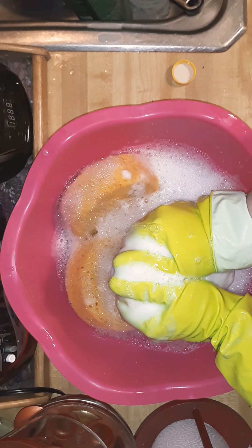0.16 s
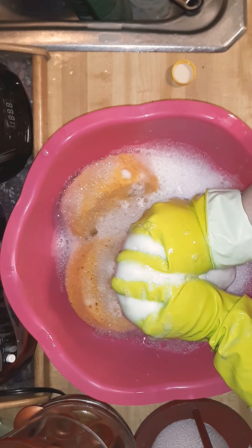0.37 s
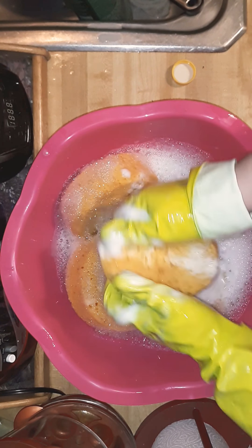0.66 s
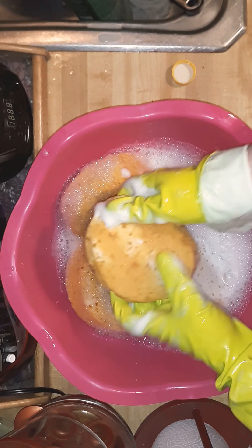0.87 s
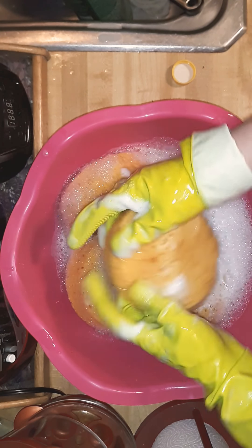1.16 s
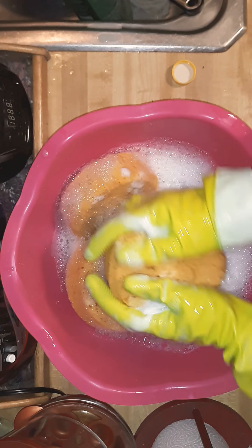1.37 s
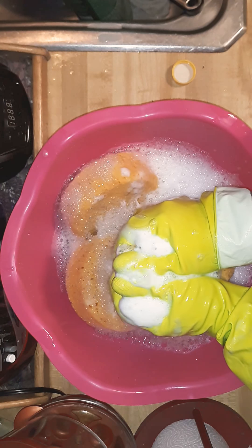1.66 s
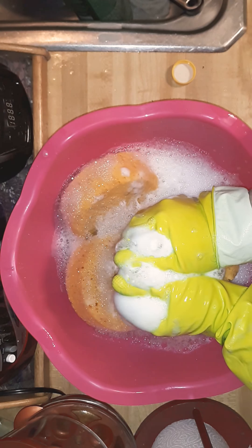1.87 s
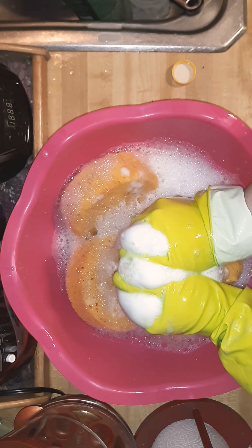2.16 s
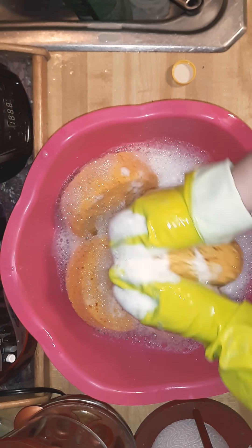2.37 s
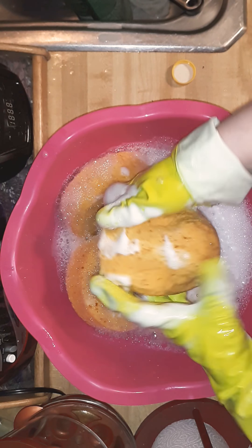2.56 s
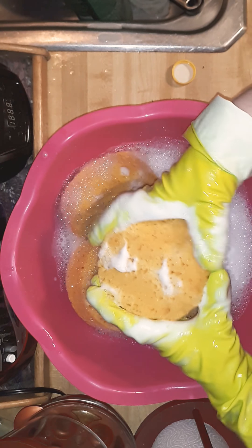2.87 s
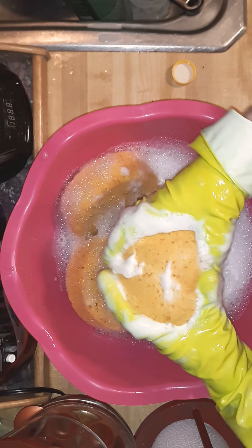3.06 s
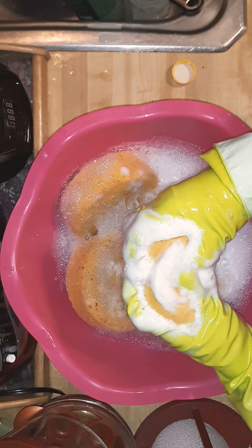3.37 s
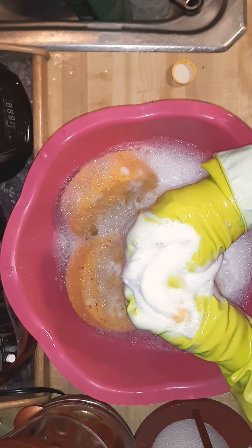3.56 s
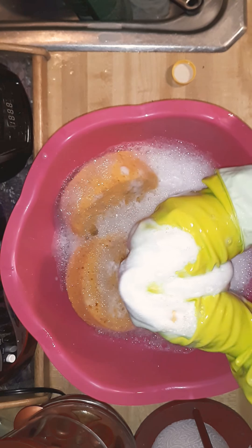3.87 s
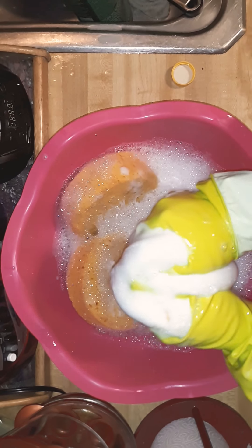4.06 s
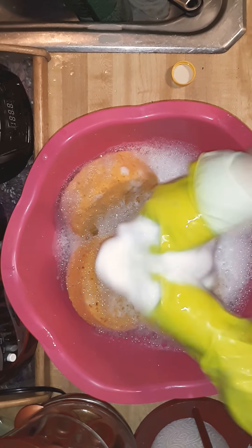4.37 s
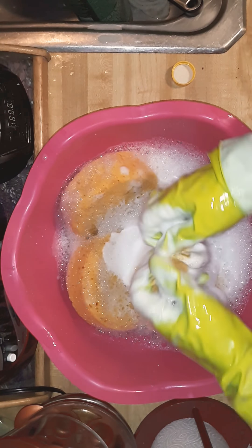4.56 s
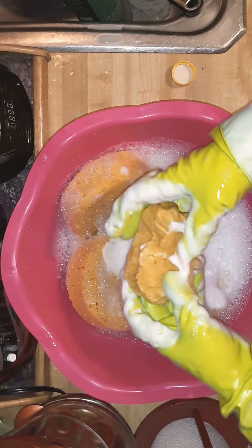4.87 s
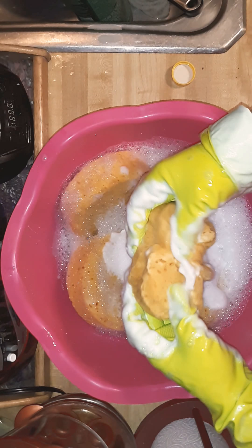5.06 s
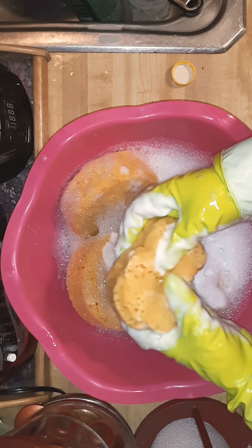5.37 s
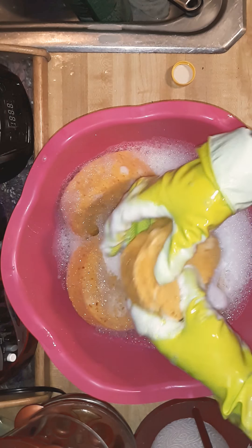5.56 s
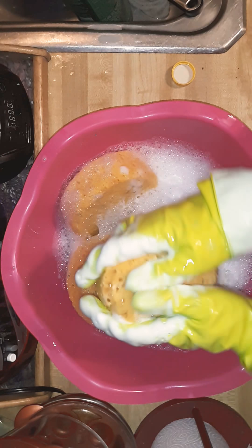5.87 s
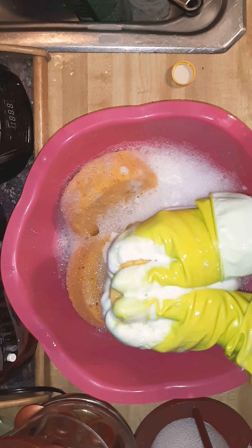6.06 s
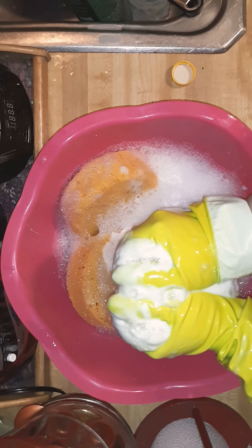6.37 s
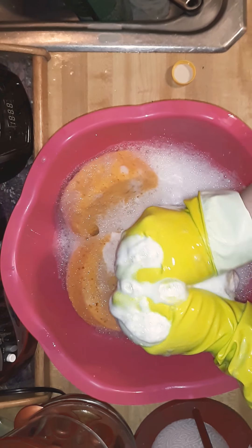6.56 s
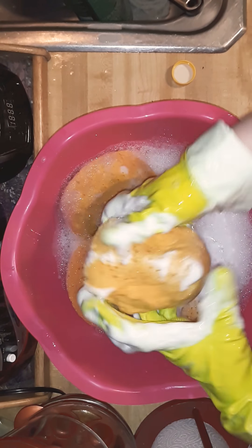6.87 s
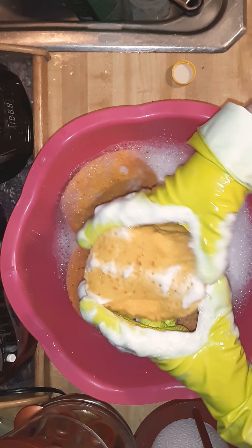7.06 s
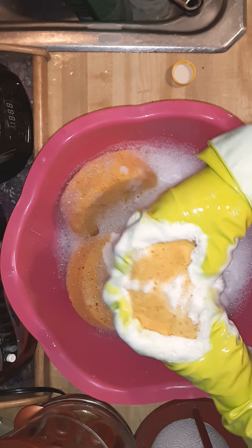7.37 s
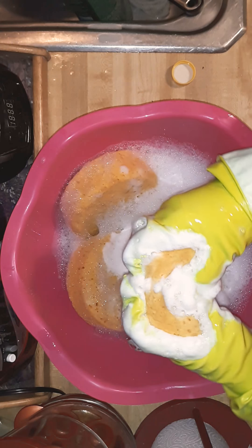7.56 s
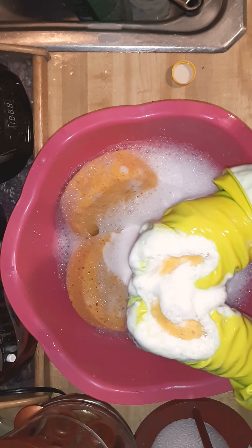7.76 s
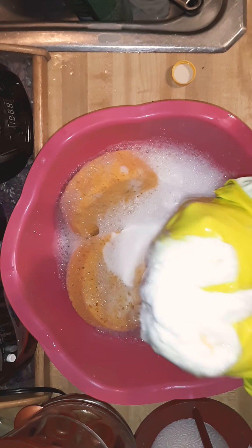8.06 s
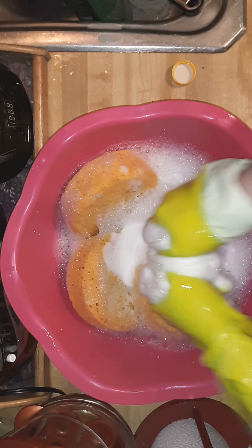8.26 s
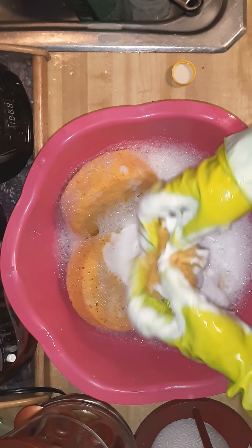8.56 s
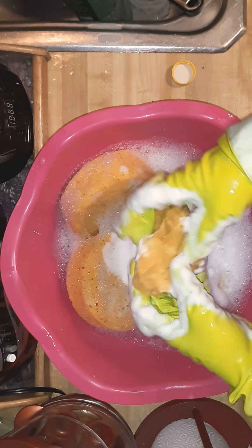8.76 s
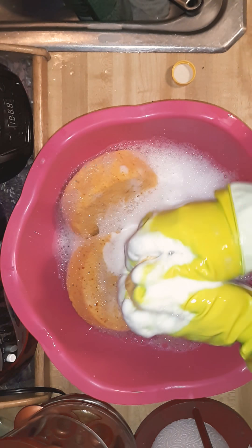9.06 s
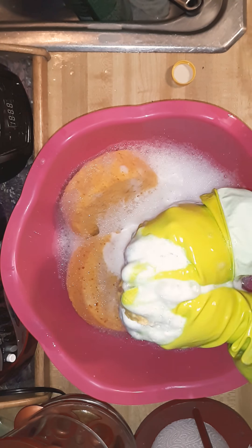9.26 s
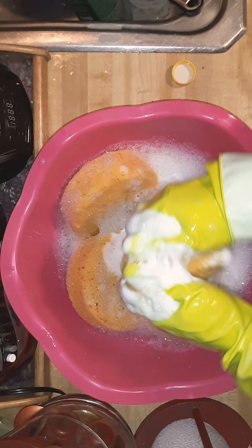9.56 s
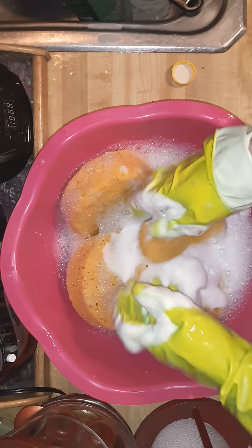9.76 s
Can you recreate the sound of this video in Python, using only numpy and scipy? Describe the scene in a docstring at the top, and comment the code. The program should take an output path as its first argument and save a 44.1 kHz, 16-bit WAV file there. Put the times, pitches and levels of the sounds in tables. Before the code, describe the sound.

Close, wet sponge squishing: soft foam crackle and gurgles grow into stronger fizzy squeezes, ending in a burst of loud bubbly pops.

```python
"""A soapy sponge, squeezed and released by gloved hands over a plastic basin, close under two microphone ports.
Dense streams of damped sines are its bubbles: low gurgle, wet squelch, airy fizz and fine foam crackle.
Single pockets pop with a spray of tiny bursts, a pore whistles as narrow noise, wads of suds land as low thuds.
The basin rings along as a bank of resonances; filtered noise makes the quiet kitchen hum behind."""
import sys
import numpy as np
from scipy import signal
from scipy.fft import rfft, irfft, next_fast_len
from scipy.io import wavfile
from scipy.ndimage import map_coordinates

SR = 44100
rng = np.random.default_rng(int(sys.argv[2]) if len(sys.argv) > 2 else 0)


def master(y):
    """Save y as 16-bit WAV."""
    cut = np.clip(np.atleast_2d(y).T, -1, 1)
    pcm = np.round(cut * 32767)  # scale
    wavfile.write(sys.argv[1], SR, pcm.astype(np.int16))


N = 437012  # samples


def sponge():
    """Large pores gurgle low, small ones squelch and fizz, the thin foam crackles on top."""
    gurgle_db, squelch_db, fizz_db, crackle_db = flows()
    # Water in the pores comes in spurts, dry foam hisses evenly.
    wet = np.clip(1.27 + (gurgle_db - fizz_db) / 16, .1, 1.3)
    spurt = wet * slips(count=700, fall=.011)  # shared by all pores

    slosh = bubbles(count=2000, hz=288, octaves=0.52, cycles=4.9, spread_db=2.5, size=960, floor=0.49)
    gurgle = bubbles(count=6000, hz=498.0, octaves=0.41, cycles=7.2, spread_db=1.0, size=640, roam=.25)
    squelch = bubbles(count=10000, hz=1476, octaves=0.25, cycles=4.2, spread_db=-0.4, size=200,
                      floor=0.67, roam=0.17)
    ticks = bubbles(count=1500, hz=2790, octaves=0.55, cycles=16, spread_db=2.0, size=300)  # ring clearly
    fizz = bubbles(count=40000, hz=3860, octaves=0.5, cycles=2.7, spread_db=0.75, size=64, roam=0.28)
    crackle = bubbles(count=80000, hz=10800, octaves=0.5, cycles=3.8, spread_db=3.5, size=32)

    # Only a hard squeeze empties the largest hollows.
    slosh_db = gurgle_db + 0.72 * (gurgle_db + 40)
    gurgle_db = gurgle_db + 0.12 * spurt + 0.19 * wobble(30)
    squelch_db = squelch_db + 1.15 * spurt + 0.82 * wet * wobble(40)
    ticks_db = fizz_db - 13
    fizz_db = fizz_db + 1.2 * spurt + 1.1 * wet * wobble(50)
    crackle_db = crackle_db + 1.2 * spurt + 1.3 * wet * wobble(66)
    return (amp(slosh_db) * slosh + amp(gurgle_db) * gurgle + amp(squelch_db) * squelch
            + amp(ticks_db) * ticks + amp(fizz_db) * fizz + amp(crackle_db) * crackle)


# Moves of the hands, each a press or a release: start of full flow t/s, rise t/s, hold t/s, fall t/s,
# water over air level/dB, air flow level/dB, extra squelch level/dB
HAND_MOVES = [(0.0, 0.018, 0.037, 0.097, 7, -70.5, 0.5), (0.13, 0.025, 0.025, 0.23, 9.5, -75, 5),
              (0.403, 0.23, 0.03, 0.22, 2, -61, 5.5), (0.535, 0.017, 0.11, 0.029, -21, -50.5, -13),
              (0.601, 0.048, 0.095, 0.25, -1, -54.5, 2.5), (0.937, 0.089, 0, 0.2, -13.5, -57, 0),
              (1.148, 0.038, 0.083, 0.15, -6.5, -62.5, -1.5), (1.439, 0.17, 0.15, 0.07, -6.5, -50, -2.5),
              (1.517, 0.022, 0.13, 0.15, 1.5, -50.5, 2.5), (1.694, 0.25, 0.17, 0.23, -7, -52, -0.5),
              (2.233, 0.77, 0.0057, 0.083, 1.5, -58, 0.5), (2.283, 0.028, 0.11, 0.61, -11.5, -55, -1),
              (2.405, 0.055, 0.056, 0.24, -3, -51, 0.0), (3.056, 0.19, 0.37, 0.32, -13, -47, -1.5),
              (3.89, 0.014, 0.0, 0.077, 13, -65, 10), (4.037, 0.66, 0.026, 0.13, 4.5, -64, 7.5),
              (4.18, 0.02, 0.061, 0.066, -13.5, -63, 6.5), (4.393, 0.07, 0.039, 0.07, 4, -53.5, 4),
              (4.502, 0.051, 0.086, 0.22, -4.5, -53.5, -3), (4.82, 0.12, 0.028, 0.96, -10, -62, -6),
              (5.104, 0.094, 0.017, 0.048, -11, -51, -6), (5.229, 0.11, 0.041, 0.026, -16.5, -53, -4.5),
              (5.357, 0.095, 0.11, 0.13, -0.5, -58, -1), (5.484, 0.06, 0.048, 0.093, 1.5, -58, 3.5),
              (5.709, 0.071, 0.065, 0.044, -4.5, -53.5, 3.5), (5.831, 0.027, 0.2, 0.18, -16, -51.5, 0),
              (6.02, 0.13, 0.14, 0.7, -3, -44, 1), (6.166, 0.04, 0.036, 0.091, -19, -35.5, 1.5),
              (6.387, 0.36, 0.15, 0.065, -11.5, -37.5, -3.5), (6.715, 0.28, 0, 0.35, -5.5, -47.5, 1),
              (7.403, 0.31, 0.41, 0.49, -18, -46, -0.5), (8.024, 0.33, 0.03, 0.15, -9, -48.5, 3.5),
              (8.128, 0.099, 0.11, 0.07, 7, -71, 13), (8.281, 0.064, 0.011, 0.031, 5, -53, 2),
              (8.363, 0.14, 0.15, 0.29, -3, -56, 1), (8.59, 0.51, 0.038, 0.033, -9.5, -51, -4),
              (8.689, 0.044, 0.013, 0.03, 3, -58, 2), (8.773, 0.11, 0.047, 0.13, -1.5, -56.5, -0.5),
              (8.95, 0.029, 0.0011, 0.059, -11, -54, 1.5), (9.04, 0.069, 0.14, 0.05, -13, -54.5, 4.5),
              (9.188, 0.15, 0.014, 0.1, 7, -54.5, 4), (9.236, 0.099, 0.16, 0.11, -8, -40.5, 2.5),
              (9.645, 0.47, 0.0093, 0.12, -2.5, -49.5, -2.5), (9.842, 1, 0, 0.31, 0.5, -61, -3.5)]
# Flow through the idle sponge: gurgle, squelch, fizz, crackle, each as level/dB
IDLE_FLOW = [-99, -80, -84, -69]
SWING_DB = 20  # gained over a rise and lost over a fall, at steepness 1
GURGLE_DB, SQUELCH_DB, CRACKLE_DB = 2.5, 1.5, -7.5  # offsets from the flow that feeds them
SQUELCH_WATER = 0.3  # share of the water level felt in the middle pores
CRACKLE_TOP_DB = -52.5  # ceiling of thin foam before water acts on it
DRAINS = 1.015  # water starts and stops this much more steeply than air
DROWNS = 0.17  # water drowns the foam, dB per dB


def flows():
    """Flow in dB through four pore sizes: every move rises, holds and falls; moves add up in power."""
    full, rise, hold, fall, water_db, air_db, extra_db = np.transpose(HAND_MOVES)[:, :, None]
    t = np.arange(0, N / SR + .005, .005)
    before = (full - t) / abs(rise)
    after = (t - full - abs(hold)) / abs(fall)
    shape_db = -SWING_DB * np.maximum(0, np.maximum(before, after))

    gurgle_db = air_db + water_db + GURGLE_DB
    squelch_db = air_db + SQUELCH_WATER * water_db + SQUELCH_DB + extra_db
    foam_db = np.minimum(air_db + CRACKLE_DB, CRACKLE_TOP_DB) - DROWNS * water_db
    levels = []
    for db, steep, idle_db in zip((gurgle_db, squelch_db, air_db, foam_db), (DRAINS, 1, 1, 1), IDLE_FLOW):
        power = (amp(db + steep * shape_db) ** 2).sum(axis=0) + amp(idle_db) ** 2
        levels.append(np.interp(np.arange(N) / SR, t, 10 * np.log10(power)))
    return levels


def bubbles(count, hz, octaves, cycles, spread_db, size, floor=.55, roam=0):
    """Random bursting bubbles, rms 1; typical pitch roams by roam octaves as pores open and close."""
    u, z = rng.random((count, 2)), rng.standard_normal((count, 2))
    drift = roam * wobble(14)[(u[:, 0] * N).astype(int)]
    pitch = np.clip(hz * 2 ** (octaves * z[:, 0] + drift), 120, SR / 2.5)
    gain = amp(-spread_db * np.log(1.005 - u[:, 1]))  # random strengths
    stream = bursts(u[:, 0] * N / SR, pitch, cycles, gain, z[:, 1], size, rise=0.032)

    def bass_cut(f):  # small bubbles radiate no bass
        lows = (f / (floor * hz)) ** 6
        return lows / (1 + lows)

    return unit(filtered(stream, bass_cut))


def bursts(s, hz, cycles, gain, place, size, rise=0):
    """Soft-started sines that decay 60 dB in cycles turns: a plain sum and one weighted by place."""
    turns = hz[:, None] * np.arange(size) / SR
    life = turns / cycles
    envelope = gain[:, None] * amp(-60 * life) * (1 - np.exp(-turns / 0.5))
    shape = envelope * np.sin(2 * np.pi * turns * (1 + rise * np.minimum(life, 1)))
    at = (np.round(s * SR).astype(int)[:, None] + np.arange(size)).ravel()
    return np.array([np.bincount(at, (shape * w).ravel(), N + size)[:N] for w in (1, place[:, None])])


def slips(count, fall):
    """Sudden slips that fade, as the log of kicks decaying over fall seconds; mean 0, rms 1."""
    u = rng.random((count, 2))
    kicks = np.bincount((u[:, 0] * N).astype(int), -np.log(1.01 - u[:, 1]), N)
    decaying = signal.lfilter([1], [1, -np.exp(-1 / (fall * SR))], kicks)
    curve = np.log(decaying + .5)
    return unit(curve - curve.mean())


# Pockets that burst: t/s, relative ring level/dB, pocket pitch f/Hz, relative snap level/dB
POCKETS = [(0.009, -35.5, 605, -50), (0.078, -34, 1440, -56), (0.143, -38, 500, -55),
           (0.203, -34.5, 1590, -54), (0.239, -38.5, 440, -58), (0.362, -31, 1380, -52),
           (0.415, -29.5, 447, -59.5), (0.433, -35, 470, -57), (0.482, -32, 557, -46),
           (0.533, -48, 2430, -52), (0.586, -39, 604, -45), (0.616, -50, 2520, -31.5),
           (1.229, -37, 684, -57), (1.519, -23, 1800, -37), (1.523, -24, 322, -50), (1.556, -19, 1580, -33),
           (1.571, -25, 348, -36), (1.604, -20.5, 1750, -50), (1.633, -25, 1880, -31.5),
           (1.633, -27, 365, -50), (2.185, -35, 855, -37), (2.304, -26, 1400, -42), (3.118, -21, 2210, -40),
           (3.889, -28, 1210, -42), (3.909, -29, 840, -56), (3.929, -22, 1190, -41.5),
           (3.977, -26.5, 1200, -64), (4.171, -31, 1430, -58), (4.185, -32, 1500, -42),
           (4.248, -33, 1100, -58), (4.393, -32.5, 360, -38), (4.414, -18, 1760, -27),
           (4.423, -17.5, 664, -25.5), (4.554, -28, 1870, -54), (4.717, -36, 1680, -50),
           (4.807, -47, 4500, -45), (4.821, -35, 1690, -62), (5.176, -48, 6000, -50),
           (5.247, -29.5, 1610, -55), (5.356, -39.5, 594, -48), (6.029, -26, 1260, -31),
           (6.044, -29, 1830, -26), (6.16, -17, 1790, -39), (6.197, -34, 910, -27), (6.221, -13, 4300, -28),
           (6.524, -26, 4280, -27), (7.135, -28, 1750, -56), (7.168, -26.5, 1730, -38.5),
           (7.231, -29.5, 1370, -39), (7.408, -25, 1480, -42), (7.482, -25.5, 1330, -51),
           (7.484, -31.5, 354, -60), (8.031, -20, 1340, -31), (8.138, -17, 1980, -26.5),
           (8.192, -19, 1150, -66), (8.271, -30.5, 810, -34), (8.288, -52, 428, -25),
           (8.389, -33.5, 725, -53), (8.438, -23.5, 2850, -42), (8.516, -26, 2580, -42),
           (8.645, -29.5, 820, -58), (8.679, -32.5, 570, -36), (8.958, -31, 1800, -43),
           (9.043, -26, 1570, -50), (9.165, -20.5, 860, -33), (9.188, -19.5, 840, -43),
           (9.221, -12, 1600, -26), (9.263, -10.5, 1840, -30), (9.271, -12, 3000, -27),
           (9.314, -14, 1640, -45), (9.34, -8.5, 3140, -27), (9.367, -12, 3660, -34),
           (9.388, -12, 4200, -31)]


def pops():
    """Each pocket breaks into a few bubbles near its pitch while its film tears in a spray of bursts."""
    s, db, hz, snap_db = np.transpose(POCKETS)[:, :, None]
    place = .35 * rng.standard_normal((len(s), 1))
    z, u = rng.standard_normal((len(s), 44)), rng.random((len(s), 44))
    late = .014 * u ** 1.3 * (np.arange(44) > 0)  # seconds; the first bubble starts the pop
    few, many = slice(0, 4), slice(4, None)

    follows = late[:, few] > 0
    ring_hz = hz * 2 ** (0.19 * z[:, few] * follows)
    ring_gain = amp(db - 3.5 - 4.7 * follows - 430 * late[:, few])
    ring = bursts((s + late[:, few]).ravel(), ring_hz.ravel(), 11.1, ring_gain.ravel(),
                  (place + 0 * z[:, few]).ravel(), size=1500, rise=0.068)

    spray_hz = np.clip(5000 * 2 ** (0.74 * z), 300, SR / 2.5)
    spray_gain = amp(snap_db + 7.5 - 1400 * abs(late - .0012))  # the tear swells, then dies
    spray_place = place + z[:, ::-1][:, many]
    spray = bursts((s + late[:, many]).ravel(), spray_hz[:, many].ravel(), 3.95,
                   spray_gain[:, many].ravel(), spray_place.ravel(), size=300)
    return ring + spray


# Air sings in one narrow pore: start t/s, length t/s, f/Hz, level/dB before swell and flutter
PORE_WHISTLES = [(4.178, 0.08, 3040, -64), (4.69, 0.34, 1685, -65), (6.051, 0.15, 1796, -41),
                 (7.014, 0.2, 1630, -67)]


def whistles():
    """Air through a narrow pore: breathy, fluttering noise bands that swell and fade."""
    t, total, flutter_db = np.arange(N) / SR, 0, 3 * wobble(60)
    for s, length, hz, db in PORE_WHISTLES:
        pore = signal.iirpeak(hz, 9, SR)
        noise = rng.standard_normal(N)
        air = unit(signal.lfilter(*pore, signal.lfilter(*pore, noise)))
        swell = abs(np.sin(np.pi * np.clip((t - s) / length, 0, 1))) ** .3
        total = total + amp(db + flutter_db) * swell * air
    return total * [[1], [0]]  # nothing in the place-weighted part


# Wads of suds that land in the basin: t/s, level/dB before the burst envelope
SUDS_LANDINGS = [(3.908, -49), (4.002, -43), (4.424, -29), (7.487, -46), (8.284, -34)]
THUD_HZ, THUD_CYCLES = 122, 4.1


def thuds():
    """A soft landing pushes the floor of the basin once: a short low damped sine."""
    s, db = np.transpose(SUDS_LANDINGS)
    return bursts(s, THUD_HZ + 0 * s, THUD_CYCLES, amp(db), 0 * s, size=3000)


# Basin resonances: f/Hz, width f/Hz, level/dB over the direct sound
BASIN_MODES = [(304.8, 7.6, 3), (397, 64, -2.5), (604, 13.5, 6.5), (786, 57, 2.5), (1313, 4.9, -2),
               (1623, 8.5, 4), (1835, 60, 0.5), (2405, 79, -2.5), (2910, 54, -2), (4250, 340, -10.5),
               (5990, 94, -6.5)]
# Tone from sponge to microphone: f/Hz, level/dB
SPONGE_PATH = [(40, -34), (120, -1), (230, -9.5), (400, -9), (980, -3), (1700, -6), (2200, -4.5),
               (4200, -1), (7000, 2.5), (9200, -3), (11300, -0.5), (15800, -7.5)]


def basin(x):
    """The hollow of the basin adds its resonances to the direct sound."""
    def response(f):
        ringing = sum(amp(db) * resonance(f, hz, width) for hz, width, db in BASIN_MODES)
        return amp(along(SPONGE_PATH, f)) * (1 + ringing)

    return filtered(x, response)


def resonance(f, hz, width):
    """Complex response of a damped resonator, 1 at its centre."""
    return 1j * f * width / (hz * hz - f * f + 1j * f * width)


def walls(x):
    """A short, thin answer from counter, sink and walls: noise that decays 60 dB in 0.14 s."""
    t = np.arange(SR // 4) / SR
    tail = rng.standard_normal((2, len(t))) * amp(-60 * t / 0.14)
    delayed = np.pad(x, (200, 0))[None]
    echo = signal.fftconvolve(delayed, tail / np.linalg.norm(tail[0]), axes=1)[:, :N]
    return filtered(echo, lambda f: f / (f + 1200))  # thins the bass


# Room tone: f/Hz, relative level/dB
ROOM_TONE = [(25, -12), (96, 13.5), (216, -1), (604, -8), (1000, -13), (1590, 2.5), (2200, -3.5),
             (2970, -4.5), (6660, 0.5), (9210, -27), (11100, -9), (15800, -40)]
# Narrow flickering bands: f/Hz, resonance width f/Hz, level/dB before flicker
FLICKER_BANDS = [(110, 26, -86), (1666, 430, -74), (11180, 550, -77.5)]


def kitchen():
    """Low room hum and the hiss of resting suds as shaped noise, with narrow bands that flicker."""
    air = filtered(rng.standard_normal((2, N)), lambda hz: amp(along(ROOM_TONE, hz)))
    total = amp(-68.5 + 0.39 * wobble(2.2)) * unit(air)
    for hz, width, db in FLICKER_BANDS:
        noise = rng.standard_normal((2, N))
        band = unit(filtered(noise, lambda f: resonance(f, hz, width) ** 2))
        total = total + amp(db + 4.3 * slips(count=500, fall=.012)) * band
    return total


# Left-right likeness: f/Hz, likeness (0 to 1)
LIKENESS = [(25, .4), (70, .8), (130, .95), (300, .93), (600, .8), (1000, .9), (2500, .68), (5000, .6),
            (12000, .25)]
# Left minus right: f/Hz, level/dB
LEFT_LEAN = [(130, 1), (380, -2.5), (550, 1.5), (790, 5), (1140, -1), (1650, .5), (4970, -.5), (7180, 0),
             (10400, 4), (15000, 0)]
# Phase by which left leads right: f/Hz, phase/rad
LEFT_LEAD = [(60, 0), (600, .5), (900, .1), (1550, .3), (3200, -.1), (15500, 0)]


def ports(pair):
    """Two microphone ports: a shared and an unshared part, unequal in level and phase."""
    def blend(hz):
        turn = np.arccos(np.clip(along(LIKENESS, hz), 0, 1)) / 2
        return np.array([np.cos(turn), np.sin(turn)])

    def tilt(hz):
        ratio = amp(along(LEFT_LEAN, hz)) * np.exp(1j * along(LEFT_LEAD, hz))
        return np.array([ratio ** .5, ratio ** -.5])

    mid, side = filtered(pair, blend)
    return filtered(np.array([mid + side, mid - side]), tilt)


def amp(db):
    """Amplitude factor of a level in dB."""
    return 10 ** (np.asarray(db) / 20)


def unit(x):
    """x scaled to rms 1."""
    return x / np.sqrt(np.mean(x ** 2) + 1e-20)


def along(points, hz):
    """Interpolate (f/Hz, value) points on a log frequency axis."""
    f, v = np.transpose(points)
    return np.interp(np.log(hz + 1), np.log(f + 1), v)


def wobble(rate):
    """A smooth random curve, rate knots a second."""
    knots = rng.standard_normal(int(N * 100 / SR) + 4)
    return map_coordinates(knots, [np.arange(N) * min(rate, 99) / SR])


def filtered(x, response):
    """x times a complex response of frequency."""
    m = next_fast_len(N + SR // 2)
    return irfft(rfft(x, m) * response(np.fft.rfftfreq(m, 1 / SR)), m)[..., :N]


def scene():
    """Sponge, pops, thuds and whistles through the basin, with kitchen and wall answer."""
    near = basin(sponge() + pops() + thuds() + whistles())
    return ports(near + kitchen()) + amp(-7.0) * walls(near[0])


def record(dry):
    """A steep band limit: nothing passes from 15830 Hz up."""
    return filtered(dry, lambda hz: hz < 15830)


dry = scene()
out = record(dry)
master(out)
```